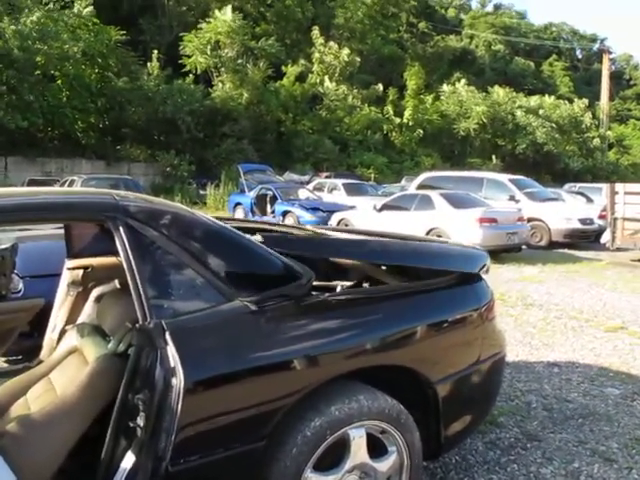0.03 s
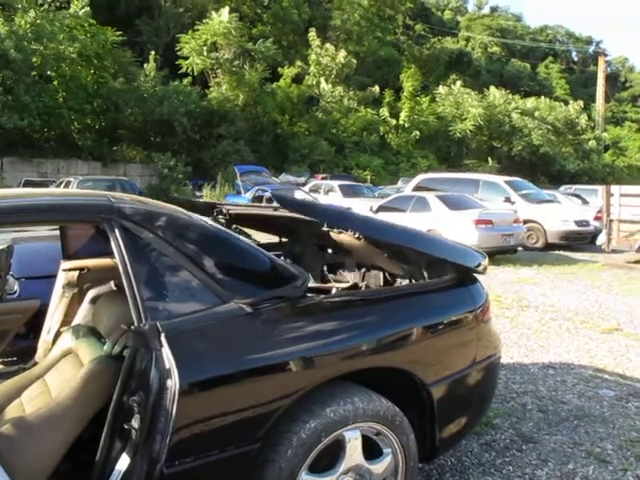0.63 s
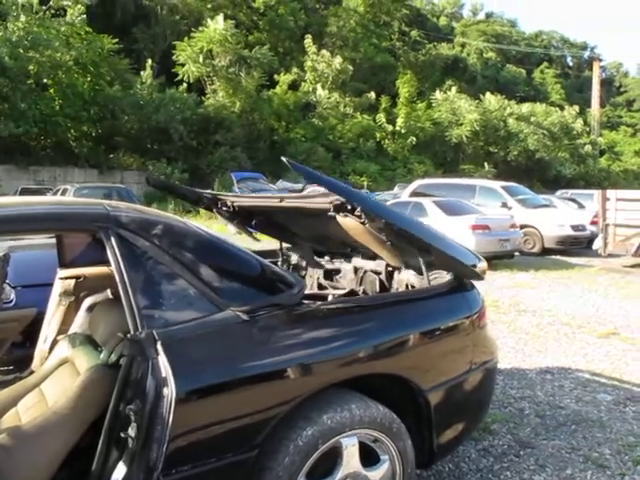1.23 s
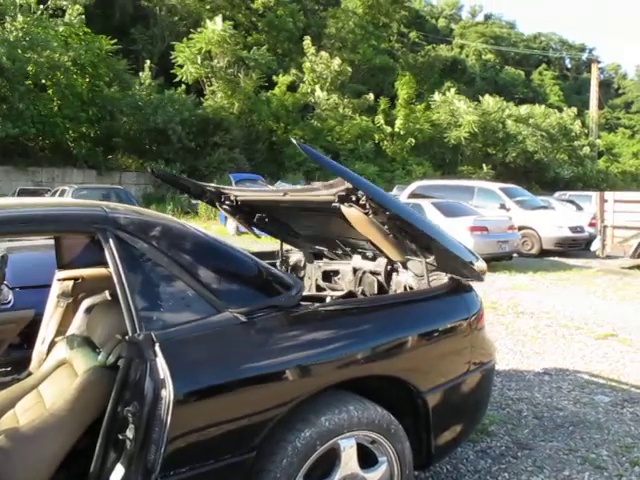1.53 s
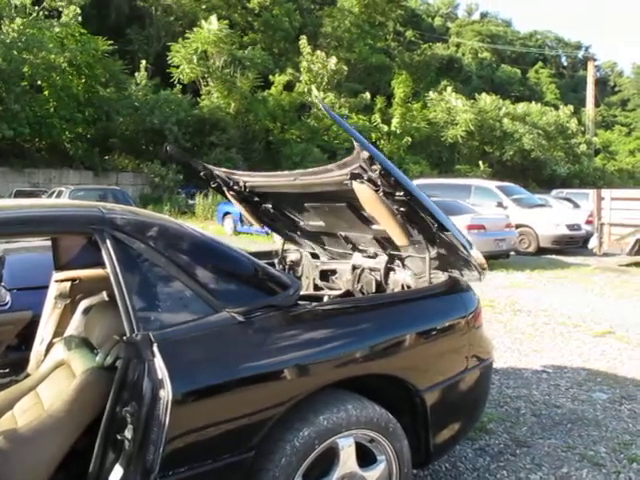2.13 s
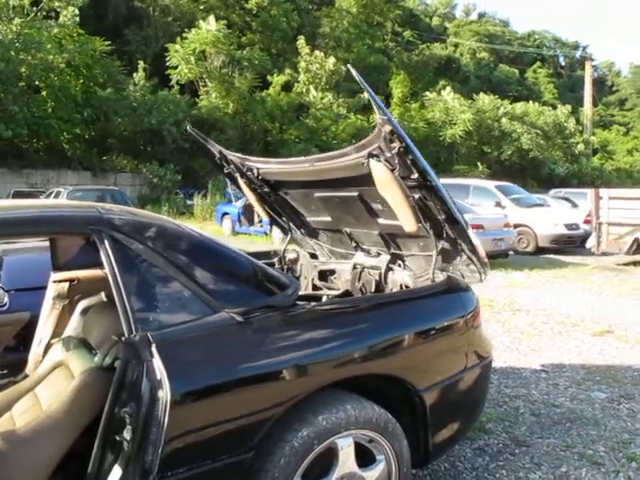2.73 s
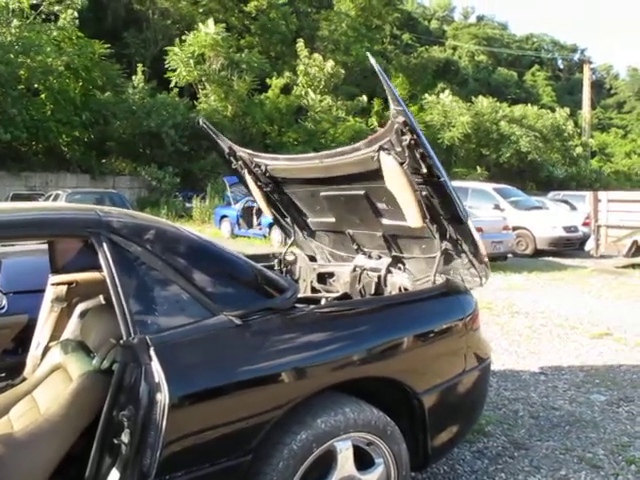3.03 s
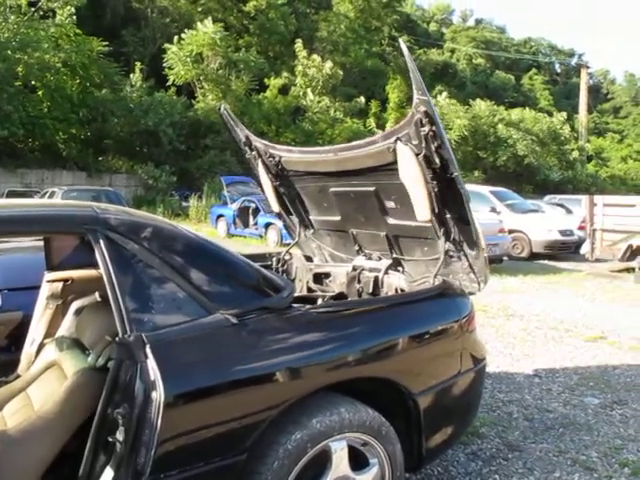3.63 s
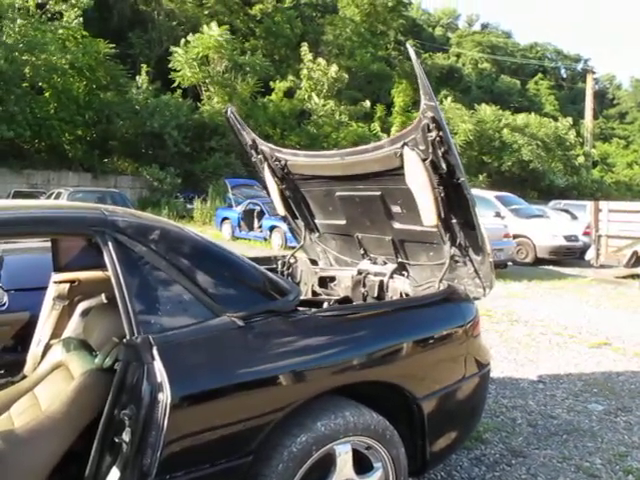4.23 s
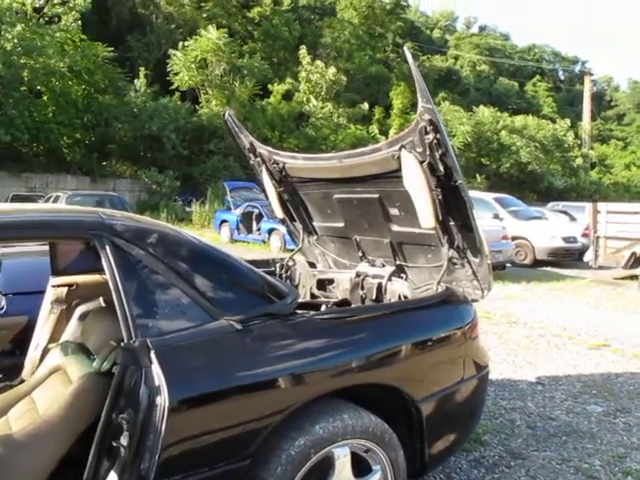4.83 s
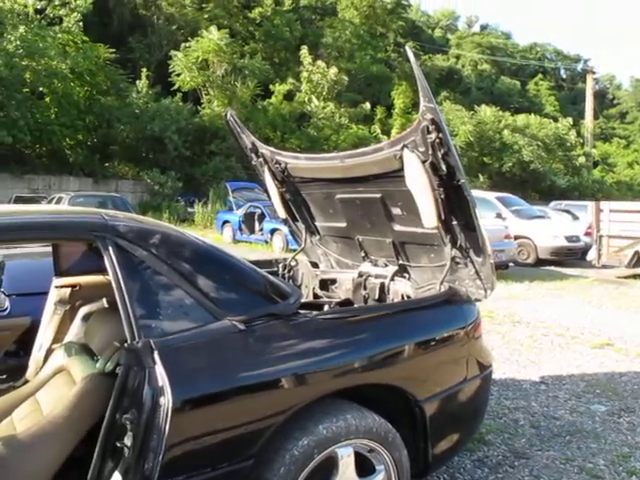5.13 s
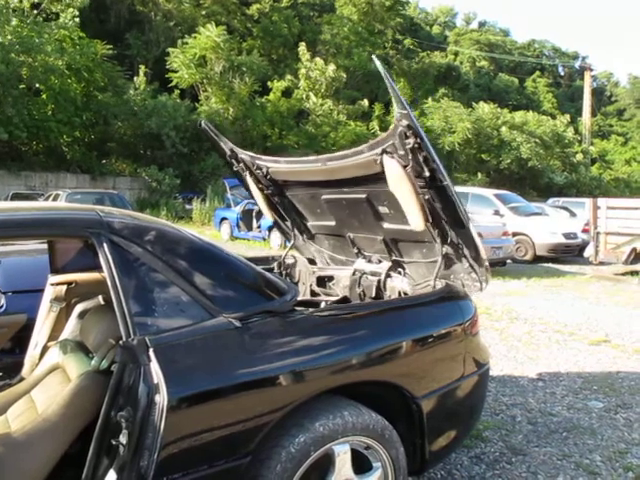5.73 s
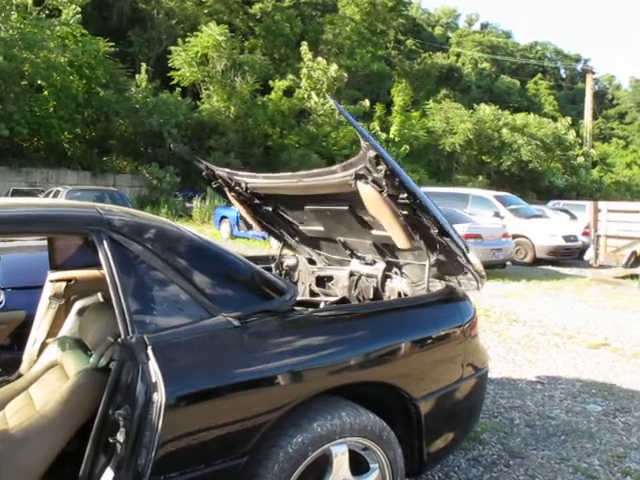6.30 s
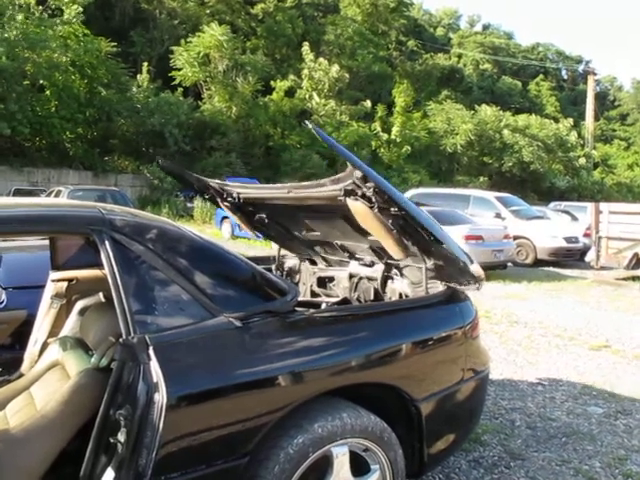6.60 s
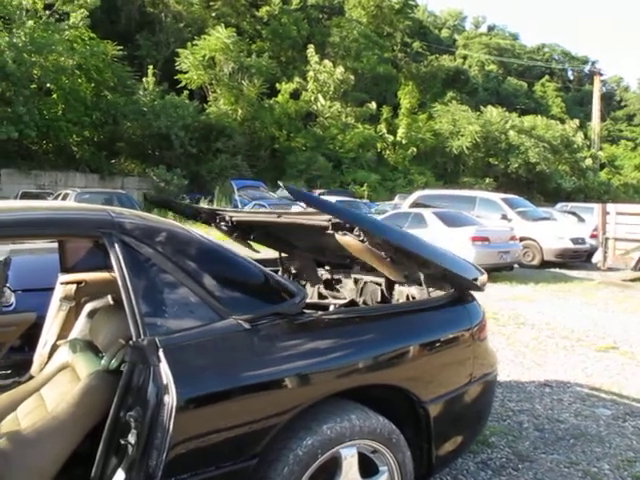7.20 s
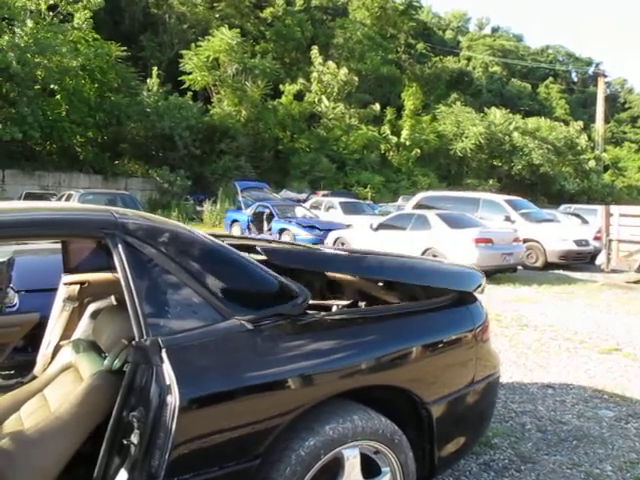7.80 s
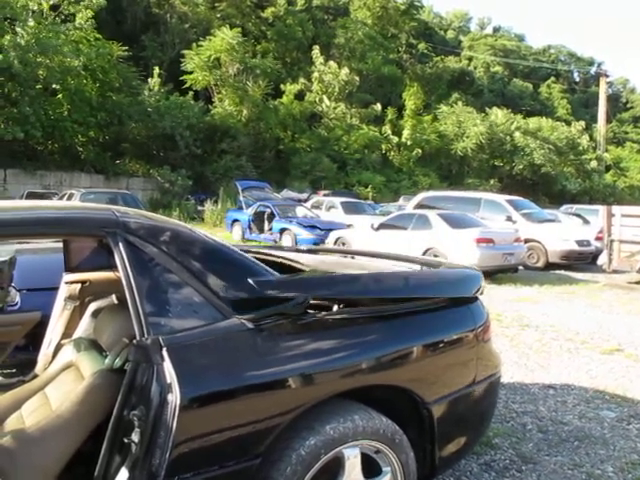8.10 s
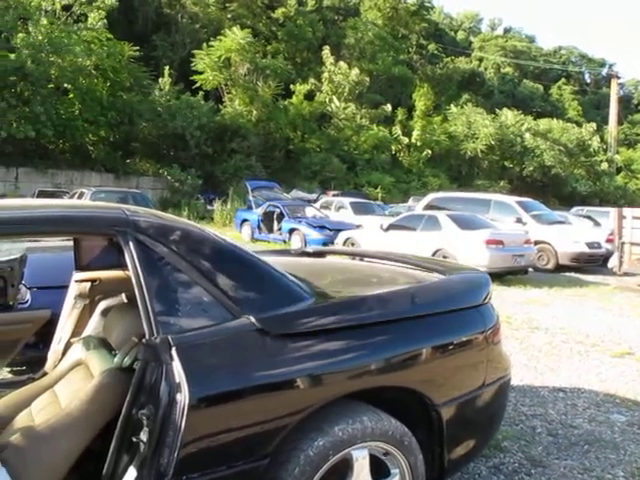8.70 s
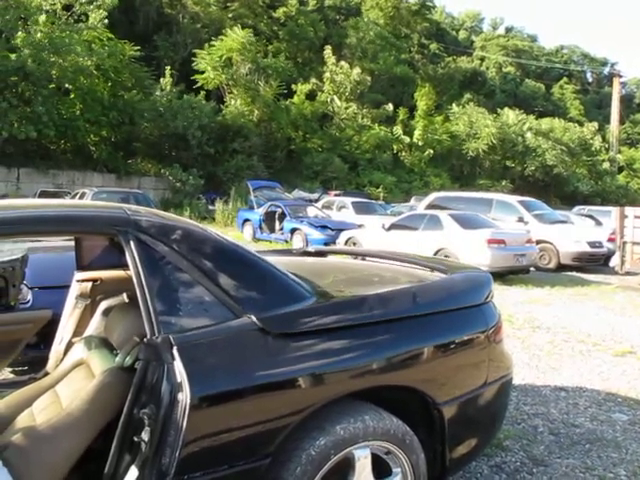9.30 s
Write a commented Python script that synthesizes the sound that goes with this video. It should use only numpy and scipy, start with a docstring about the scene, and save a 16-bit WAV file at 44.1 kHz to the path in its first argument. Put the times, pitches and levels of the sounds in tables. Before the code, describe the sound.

Uneven gusts thump and rumble against an outdoor microphone, louder than the car nearby. Beneath them, a convertible's powered lid opens with a soft electric whine and knocks lightly at the end of its travel. It waits about two seconds, then whirrs back down with small ticks and a faint squeak. Near the end it clunks shut and latches, the motor running on more lightly.

```python
"""In an open gravel lot, wind rumbles and flutters on the microphone over a thin outdoor hiss.
A small motor whirrs and whines quietly as it raises the roof lid of a convertible, and the linkage
knocks at the end of its travel near 3.5 s. The lid stands open with a faint purr until 5.4 s, then
sinks again, lands and latches near 8.4 s; the motor runs on more lightly. Throughout, gusts shed
eddies on the microphone, and the hardest buffets overload it for an instant."""
import sys
import numpy as np
from scipy import signal
from scipy.fft import rfft, irfft, next_fast_len
from scipy.io import wavfile
from scipy.ndimage import uniform_filter1d, minimum_filter1d

SR = 44100
rng = np.random.default_rng(int(sys.argv[2]) if len(sys.argv) > 2 else 0)


def unload_audio(sound):
    """Save the sound as a 16-bit wav file, at the path given as the first command line argument."""
    columns = np.transpose(np.atleast_2d(sound))
    # keep every value between -1 and 1, then stretch to whole-number steps
    steps = np.round(np.clip(columns, -1, 1) * 32767)
    wavfile.write(sys.argv[1], SR, steps.astype(np.int16))


N = 421155
T = np.arange(N) / SR

# The motor raises, then lowers the lid. Each row: start and stop in seconds, relative whirr level in dB.
MOTOR_RUNS = [(-0.5, 3.55, -56.5), (5.41, 9.7, -60.5)]


def motor(ripple=0.37, wobble=0.00418, sparks_per_s=700, latched_s=8.4, surge_db=4.5, surge_s=0.2):
    """Friction and resonance: brushes rub, their sparks ring the casing, and meshing gears whine."""
    # Gear whine, faster under light load. Each row: time in seconds, pitch in Hz, relative level in dB.
    gear_curve = [(0, 1128, -58), (1.0, 1095, -66), (1.7, 1177, -59), (2.3, 1090, -59.5),
                  (3.55, 1131, -57.5), (5.45, 1127, -62), (5.7, 1228, -55), (6.3, 1197, -89),
                  (9.55, 1168, -68)]
    # Brush noise. Each row: frequency in Hz, relative spectral level in dB.
    brush_spectrum = [(300, 6), (700, 7), (1200, -2.5), (2000, -6.5), (3300, -7.5), (4200, -14),
                      (5500, -18), (6500, -5), (8100, -6.5), (9000, -2), (9400, -9.5), (10000, -7.5),
                      (10500, -15), (11700, -20), (13000, -34), (16000, -44)]
    # Casing modes. Each row: frequency in Hz, t60 in seconds, relative dB raising and lowering.
    casing_modes = [(3310, .015, -5.5, -29), (3600, 0.049, -15, -7.5), (4720, 0.017, -11, -11),
                    (6540, 0.0051, -12, 2), (8250, .02, 1.5, 8), (8930, 0.075, -5, 1.5),
                    (9300, 0.027, -13, -3), (9770, 0.017, -12, -33), (10080, 0.036, -12, -16),
                    (10950, .015, -29, -35), (11160, 0.023, -19, -28), (11600, .025, -28, -34)]
    running = [np.clip((T - start) / 0.0042, 0, 1) * np.clip((stop - T) / 0.027, 0, 1)
               for start, stop, _ in MOTOR_RUNS]
    # the motor strains as it starts, then settles
    raising, lowering = [on * from_db(db + surge_db * np.exp(-np.abs(T - start) / surge_s))
                         for on, (start, _, db) in zip(running, MOTOR_RUNS)]
    gear_hz, whine_db = in_time(gear_curve)
    phase = 2 * np.pi * np.cumsum(gear_hz * (1 + wobble * drift(24.9))) / SR
    brushes = noise(brush_spectrum) * (1 + ripple * np.sin(phase)) * from_db(1.28 * drift(59))
    sparks = (rng.random(N) < sparks_per_s / SR) * rng.standard_normal(N)
    # each direction loads the casing differently, and the load eases once the lid is latched
    load_db = -7.5 - 8.0 * (T > latched_s)
    casing = np.zeros(N)
    for hz, t60, up_db, down_db in casing_modes:
        drive = raising * from_db(up_db) + lowering * from_db(down_db)
        casing += rms_one(ring(sparks, hz, t60)) * from_db(load_db + 2.5 * drift(13)) * drive
    whine = sum(running) * from_db(whine_db - 5.5) * np.sin(phase) * (1 + 1.9 * drift(40))
    return from_db(5.5) * (raising + lowering) * brushes + casing + whine


def latch(snap_edge_hz=9300, rattle_t60=0.086):
    """Impact excitation: linkage and latch strike the lid and ring its modes; soft contacts are dull."""
    # Contacts. Each row: time in seconds, relative level in dB, upper edge of the force in Hz.
    knocks = [(3.508, -36.5, 12000), (3.531, -48.5, 9000), (3.62, -38, 11000), (3.739, -43, 15000),
              (5.413, -37, 12000), (5.754, -35.5, 5500), (5.775, -47, 5000), (6.768, -38, 7200),
              (8.2845, -19.5, 2200), (8.293, -31, 2000), (8.366, -24.5, 2780), (8.4, -18.5, 8000),
              (8.403, -42, 3000), (8.424, -38, 5020)]
    # Modes of lid and latch. Each row: frequency in Hz, relative level in dB, t60 in seconds.
    lid_modes = [(474, -1, 0.0098), (1340, -20, 0.093), (1570, -15, .11), (2090, -39, 0.1),
                 (2290, 1.5, 0.039), (2650, -6, 0.019), (2920, -9, 0.053), (3360, 2, 0.037),
                 (3730, -25.5, 0.11), (4160, -4, 0.024), (4550, -0.5, 0.022), (5570, -10.5, 0.027),
                 (5950, -11, 0.033), (7830, 5, 0.032), (8500, -5, 0.022)]
    # Response of the boot. Each row: frequency in Hz, relative spectral level in dB.
    boot_spectrum = [(300, 9), (1200, 12), (2200, 2), (3400, -4), (5000, -7), (8000, -15), (11000, -18),
                     (16000, -34)]
    force = np.zeros(N)
    for s, db, edge_hz in knocks:
        at, blow = int(s * SR), from_db(db) * signal.unit_impulse(SR // 10)
        force[at:at + len(blow)] += signal.sosfilt(butterworth(2, edge_hz), blow + 1e-18)
    modes = sum(from_db(db) * ring(force, hz, t60) for hz, db, t60 in lid_modes)
    # the contact itself is heard first, then the rattle of the hollow boot
    snap = signal.sosfilt(butterworth(6, snap_edge_hz), force + 1e-18)
    age = T[:SR // 4]
    envelope = (1 - np.exp(-age / 0.00047)) * from_db(-60 * age / rattle_t60)
    boot = noise(boot_spectrum)[:len(age)] * envelope
    rattle = signal.fftconvolve(force, boot)[:N]
    return from_db(9.5) * snap + from_db(-20) * modes + from_db(-10) * rattle


def purr(flutter_db=7.5, hum_hz=985, hum_wobble=0.0027):
    """Random modulation: the waiting mechanism purrs as fluttering noise and a wavering hum."""
    # Purr while the lid stands open. Each row: time in seconds, relative level in dB.
    purr_curve = [(3.55, -66), (3.9, -65.5), (4.3, -62.5), (4.8, -60), (5.15, -68), (5.4, -84)]
    # Its noise. Each row: frequency in Hz, relative spectral level in dB.
    purr_spectrum = [(300, -18), (650, 7.5), (850, -29), (1300, -1), (1750, 2.5), (2000, -13), (3000, -30),
                     (3500, -11), (4000, -18), (9000, -45)]
    level_db, = in_time(purr_curve)
    waiting = (T > MOTOR_RUNS[0][1]) & (T < MOTOR_RUNS[1][0])
    hum_gain = from_db(1.5 + 2.0 * np.tanh(drift(25)))
    hum = hum_gain * np.sin(2 * np.pi * hum_hz * np.cumsum(1 + hum_wobble * drift(25)) / SR)
    flutter = from_db(flutter_db * np.tanh(drift(34))) * noise(purr_spectrum)
    return waiting * from_db(level_db) * (flutter + hum)


def wind(lumpy_db=5.0, swirl_share=0.43):
    """Turbulent pressure on the microphone: large eddies rumble, small ones flutter in uneven lumps."""
    # Large, middle-sized and small eddies. Each row: frequency in Hz, relative spectral level in dB.
    rumble_spectrum = [(3, -44), (8, 5.5), (33, 2.5), (52, -2), (75, -15), (120, -35.5), (220, -44.5),
                       (500, -85)]
    swirl_spectrum = [(35, -9), (75, 4.5), (110, -3), (160, -15.5), (300, -62), (600, -89)]
    flutter_spectrum = [(60, -17.5), (115, 4), (170, 2), (250, -6.5), (340, -14), (500, -24), (900, -39),
                        (2000, -79)]
    rumble_db, flutter_db = airflow()
    flutter_db = flutter_db + 1.5 * np.tanh(drift(8))
    # middle-sized swirls lie between the two in strength
    swirl_db = rumble_db + swirl_share * (flutter_db - rumble_db)
    rumble = from_db(rumble_db + 1.5) * turbulence(rumble_spectrum, span_s=0.03)
    swirl = rms_one(turbulence(swirl_spectrum, span_s=0.028) * from_db(drift(28)))
    small_eddies = turbulence(flutter_spectrum, span_s=0.019)
    flutter = rms_one(small_eddies * from_db(lumpy_db * np.minimum(drift(68.5), 1.4)))
    return rumble + from_db(swirl_db - 2.0) * swirl + from_db(flutter_db - 2.33) * flutter


def airflow(rise_s=0.016, fall_s=0.026, steepness=1.82, step=40):
    """Incoherent addition: gusts add their power to the breeze, giving rumble and flutter in dB."""
    # Breeze between gusts. Each row: time in seconds, relative rumble and flutter levels in dB.
    breeze = [(0, -29.5, -56), (0.5, -24.5, -60), (1.0, -23.5, -28), (2.1, -24, -40), (2.6, -21.5, -41),
              (3.3, -18.5, -28), (3.52, -23, -43), (3.6, -31.5, -60), (4.2, -30.5, -55), (5.0, -28, -38.5),
              (5.6, -18.5, -27.5), (6.45, -33.5, -46.5), (7.0, -27, -51), (7.62, -25, -54),
              (7.75, -29, -25.5), (9.55, -22, -32.5)]
    # Gusts. Each row: start and length in seconds, relative rumble and flutter levels in dB.
    gusts = [(-0.03, 0.063, -27, -27), (0.13, 0.038, -16, -38), (0.403, 0.018, -27, -20.5),
             (0.523, 0.1, -16.5, -29.5), (0.661, 0.025, -23, -20), (0.818, 0.11, -22, -16),
             (0.893, 0.082, -13.5, -17), (0.984, 0.061, -13, -20.5), (1.154, 0.06, -20, -18),
             (1.375, 0.028, -14.5, -20), (1.43, 0.048, -18, -49), (1.54, 0.085, -22.5, -52),
             (1.62, 0.091, -26, -30.5), (1.703, 0.046, -17.5, -34), (1.835, 0.056, -16, -49),
             (1.897, 0.044, -14.5, -26), (1.974, 0.036, -16, -30), (2.17, 0.12, -18, -34),
             (2.24, 0.074, -33, -18.5), (2.322, 0.034, -23, -15.5), (2.42, 0.042, -32, -19.5),
             (2.643, 0.16, -21, -20), (2.834, 0.095, -15, -15), (2.97, 0.086, -25, -19.5),
             (3.135, 0.14, -28, -16), (3.756, 0.046, -29.5, -38.5), (4.375, 0.11, -22, -46),
             (4.602, 0.045, -24, -32), (4.727, 0.049, -30, -16), (4.792, 0.12, -23.5, -19.5),
             (5.06, 0.14, -16.5, -19.5), (5.199, 0.072, -18, -12.5), (5.308, 0.091, -18.5, -15.5),
             (5.411, 0.021, -26, -11), (5.48, 0.043, -31, -25.5), (5.644, 0.17, -25, -29.5),
             (5.745, 0.17, -22, -17), (5.92, 0.13, -27, -23.5), (6.03, 0.12, -29, -28),
             (6.32, 0.036, -18.5, -29.5), (6.54, 0.035, -29, -45), (6.768, 0.033, -32, -52),
             (7.138, 0.031, -13, -25.5), (7.194, 0.058, -24.5, -23.5), (7.337, 0.027, -31, -28),
             (7.667, 0.095, -26.5, -26.5), (7.82, 0.25, -28.5, -23.5), (8.201, 0.26, -27.5, -20.5),
             (8.61, 0.094, -19.5, -37), (8.805, 0.064, -14.5, -22), (8.973, 0.068, -20, -16),
             (9.069, 0.049, -22, -26), (9.217, 0.024, -16, -33)]
    t = T[::step]
    rumble, flutter = [from_db(db[::step]) ** 2 for db in in_time(breeze)]
    for start, length, rumble_db, flutter_db in gusts:
        age = t - start
        swell = np.clip(age / rise_s, 0, 1) * np.exp(-np.maximum(age - length, 0) / fall_s)
        rumble += (from_db(rumble_db) * swell) ** 2
        # flutter needs faster air, so it comes later and stops sooner
        flutter += (from_db(flutter_db) * swell ** steepness) ** 2
    return [np.interp(T, t, 10 * np.log10(power)) for power in (rumble, flutter)]


def turbulence(spectrum, span_s):
    """Steady turbulence: eddy pressure divided by its running rms has even strength over the span."""
    pressure, size = noise(spectrum), int(span_s * SR)
    power = uniform_filter1d(uniform_filter1d(pressure ** 2, size), size)
    return pressure / np.sqrt(np.abs(power) + 1e-6)


def blasts(ragged_db=4.0, rise_s=0.00086, fall_s=0.0027, middling_hz=1054, middling_db=-21):
    """Vortex breakdown at the microphone port: ragged puffs that reach higher in faster air."""
    # Fine turbulence at the height of gusts. Each row: start and length in seconds, relative level in dB.
    packets = [(0.829, 0.012, -31), (0.842, 0.015, -27), (0.855, 0.019, -14.5), (0.894, 0.019, -21),
               (1.36, 0.0071, -21.5), (2.264, 0.015, -32), (2.29, 0.019, -23.5), (2.339, 0.035, -21),
               (2.378, 0.025, -29.5), (2.429, 0.032, -28.5), (2.67, 0.019, -23.5), (2.692, 0.058, -30),
               (2.776, 0.016, -23.5), (2.885, 0.05, -21), (2.93, 0.039, -28), (3.021, 0.012, -19.5),
               (3.155, 0.012, -24), (3.22, 0.048, -19), (4.749, 0.051, -29), (4.829, 0.018, -24),
               (4.886, 0.028, -33.5), (5.088, 0.012, -25), (5.125, 0.013, -17.5), (5.152, 0.041, -23.5),
               (5.205, 0.052, -24), (5.28, 0.021, -22.5), (5.329, 0.033, -20.5), (5.368, 0.0088, -18.5),
               (5.38, 0.023, -20), (5.424, 0.026, -22.5), (5.483, 0.016, -27.5), (5.751, 0.018, -27),
               (5.769, 0.018, -21), (5.813, 0.061, -24), (5.878, 0.019, -16), (5.934, 0.0087, -20.5),
               (5.993, 0.038, -23), (6.036, 0.073, -28.5), (7.203, 0.022, -22), (7.227, 0.028, -24.5),
               (7.257, 0.031, -32), (7.699, 0.078, -32), (7.828, 0.07, -28.5), (7.976, 0.048, -27.5),
               (8.088, 0.05, -28.5), (8.189, 0.12, -29.5), (8.343, 0.075, -26), (8.821, 0.031, -30.5),
               (9.003, 0.021, -27)]
    out, size = np.zeros(N), int(0.15 * SR)
    age = np.arange(size) / SR
    pressure = rng.standard_normal(N) * from_db(ragged_db * drift(206))
    # smaller eddies carry less energy
    slope = np.vstack([butterworth(2, 215, "high"), butterworth(1, 280), butterworth(1, 400)])
    for s, length, db in packets:
        at = int(s * SR)
        edge_hz = middling_hz * 2 ** ((db - middling_db) / 9)   # an octave higher for each 9 dB
        band = np.vstack([slope, butterworth(3, edge_hz)])
        envelope = np.clip(age / rise_s, 0, 1) * np.exp(-np.maximum(age + fall_s - length, 0) / fall_s)
        puff = signal.sosfilt(band, envelope * pressure[at:at + size])
        out[at:at + size] += from_db(db) * rms_one(puff) * np.sqrt(length * SR / size)
    return from_db(-0.92) * out


def overloads(air, width_s=0.004):
    """Overload: a hard pressure thump briefly replaces the wind noise and leaves a tick."""
    # The hardest buffets. Each row: time in seconds, peak pressure in dB, tick level in dB.
    slams = [(0.866, 3.0, -11), (1.064, 2.5, -15), (2.35, -1, -26), (2.755, -0.5, -42), (2.879, 1.5, -50),
             (3.19, 1.0, -55.5), (5.082, -2.5, -38), (5.2, 1, -55), (5.405, 0, -35), (5.88, -0.5, -57)]
    ticks, out = np.zeros(N), air.copy()
    for s, peak_db, tick_db in slams:
        near = np.abs(T - s) < 5 * width_s
        pulse = np.exp(-((T[near] - s) / width_s) ** 2)
        out[near] *= 1 - pulse ** 0.25
        out[near] += rng.choice([-1, 1]) * from_db(peak_db) * pulse
        ticks[int(s * SR)] = from_db(tick_db)
    return out + signal.lfilter([1], [1, -0.5], ticks)


def outdoors(follow=0.98, lone_whistle_hz=2513):
    """Common modulation: distant air, high hiss and faint whistles swell together; one wavers alone."""
    # Distant air and narrow high hiss. Each row: frequency in Hz, relative spectral level in dB.
    air_spectrum = [(40, 8), (200, 14), (450, 7), (750, 0.5), (1100, 0), (1700, -3.5), (2100, -9),
                    (3400, -12), (4200, -15.5), (6000, -14), (9000, -19.5), (15000, -42)]
    hiss_spectrum = [(3000, -15.5), (5300, -19), (6600, -10.5), (7300, -1), (7850, 4.5), (8300, -8),
                     (9000, -7), (9800, -17), (11500, -23), (15500, -65)]
    # Swell of the hiss. Each row: time in seconds, relative level in dB.
    hiss_curve = [(0, -53), (1.8, -52), (2.6, -58), (3.9, -57), (5.0, -53), (5.6, -53.7), (6.2, -57),
                  (8.3, -52), (9.55, -55.5)]
    # Electrical whistles. Each row: frequency in Hz, relative level in dB.
    whistle_tones = [(5401, -70.5), (5522, -82), (5642, -71.5), (5761, -80), (5821, -85), (6002, -92),
                     (6121, -83), (6302, -92)]
    hiss_db, = in_time(hiss_curve)
    swell = from_db(follow * (hiss_db - np.mean(hiss_db)))
    air = from_db(-47.5) * noise(air_spectrum)
    whistles = sum(from_db(db - 6.5 + 2.7 * drift(2.7)) * np.sqrt(2) * np.sin(2 * np.pi * hz * T)
                   for hz, db in whistle_tones)
    lone_gain = from_db(-70 + 4.5 * drift(3.2))
    lone_whistle = lone_gain * np.sin(2 * np.pi * lone_whistle_hz * T + 0.45 * drift(24))
    hiss = from_db(hiss_db - 2.14) * noise(hiss_spectrum)
    return swell * (air + whistles) + lone_whistle + hiss


def chirps(width_s=0.012, scatter=0.047):
    """Frequency modulation: faint squeaks of unsteady pitch swell and fade under Gaussian envelopes."""
    # Squeaks. Each row: time in seconds, pitch in Hz, peak level in dB.
    squeaks = [(1.725, 3550, -53.5), (1.795, 3480, -56), (3.745, 13200, -64), (4.35, 3600, -61),
               (5.76, 3700, -48.5), (9.14, 3500, -54), (9.21, 3540, -55)]
    out = np.zeros(N)
    wavering_time = np.cumsum(1 + scatter * drift(300)) / SR
    for s, hz, db in squeaks:
        near = np.abs(T - s) < 4 * width_s
        envelope = from_db(db) * np.exp(-((T[near] - s) / width_s) ** 2)
        out[near] += envelope * np.sin(2 * np.pi * hz * wavering_time[near])
    return out


def limiter(x, limit_db=-6.5, recovery_db_per_s=7.5, window=441, smoothing=129):
    """Automatic gain control: short-term power over the limit ducks the gain, which then creeps back."""
    level_db = 10 * np.log10(np.abs(uniform_filter1d(x ** 2, window)) + 1e-12)
    over_db = np.maximum(level_db - limit_db, 0)
    recovery_db = recovery_db_per_s * T
    gain_db = recovery_db - np.maximum.accumulate(over_db + recovery_db, axis=-1)
    ahead_db = minimum_filter1d(gain_db, 2 * smoothing)
    return x * from_db(uniform_filter1d(uniform_filter1d(ahead_db, smoothing), smoothing))


def ring(x, hz, t60):
    """Damped resonance: a unit click starts a sine of height 1 that falls 60 dB in t60 seconds."""
    radius, angle = from_db(-60 / (t60 * SR)), 2 * np.pi * hz / SR
    return signal.lfilter([0, np.sin(angle)], [1, -2 * radius * np.cos(angle), radius ** 2], x + 1e-18)


def noise(spectrum):
    """Spectral shaping: white noise takes on the given spectrum, at unit power."""
    size = next_fast_len(N)
    hz, db = np.transpose(spectrum)
    bins = np.maximum(np.fft.rfftfreq(size, 1 / SR), 1)
    gain = from_db(np.interp(np.log(bins), np.log(hz), db))
    return rms_one(irfft(rfft(rng.standard_normal(size)) * gain, size)[:N])


def drift(rate_hz, step=10):
    """Low-pass noise: a smooth random wander of unit spread, mostly slower than the given rate."""
    size = next_fast_len(N // step + 2)
    gain = 1 / (1 + (np.fft.rfftfreq(size, step / SR) / rate_hz) ** 2) ** 2
    slow = rms_one(irfft(rfft(rng.standard_normal(size)) * gain, size))
    return np.interp(T, np.arange(size) * step / SR, slow)


def butterworth(order, hz, kind="low"):
    """Sections of a maximally flat filter."""
    return signal.butter(order, hz, kind, fs=SR, output="sos")


def in_time(rows):
    """Linear interpolation of each column of a curve table at every sample."""
    s, *columns = np.transpose(rows)
    return [np.interp(T, s, column) for column in columns]


def from_db(db):
    """Decibels to amplitude gain."""
    return np.exp(np.asarray(db) * (np.log(10) / 20))


def rms_one(x):
    """Normalisation to unit power."""
    return x / np.sqrt(np.mean(x ** 2) + 1e-20)


def scene():
    """Superposition: the car, the wind on the microphone and the lot add in one channel."""
    car = motor() + purr() + latch()
    return (car + overloads(wind()) + blasts() + outdoors() + chirps())[None, :]


def record(dry, ceiling=0.61, cutoff_hz=15700):
    """Limiting and saturation: hard buffets are ducked, overshoots flattened and the top cut steeply."""
    held = limiter(dry)
    flattened = held / (1 + np.abs(held / ceiling) ** 8) ** (1 / 8)
    return signal.sosfilt(signal.ellip(10, 0.1, 80, cutoff_hz, fs=SR, output="sos"), flattened)


dry = scene()
out = record(dry)
unload_audio(out)
```